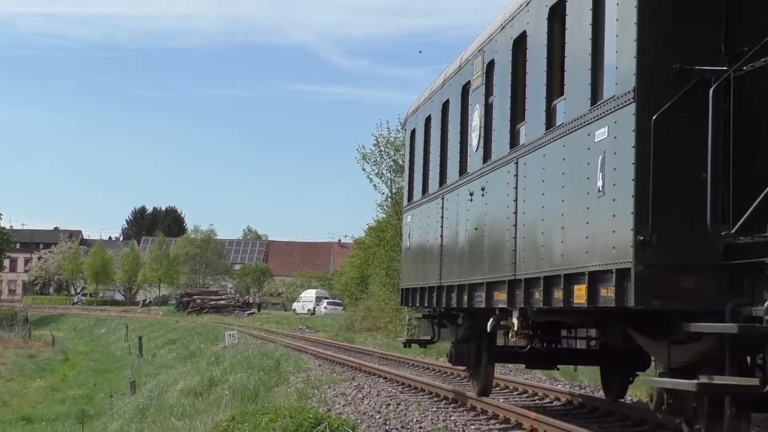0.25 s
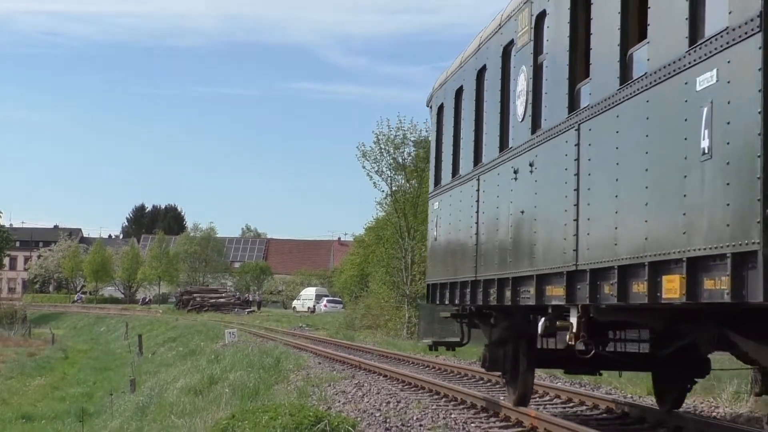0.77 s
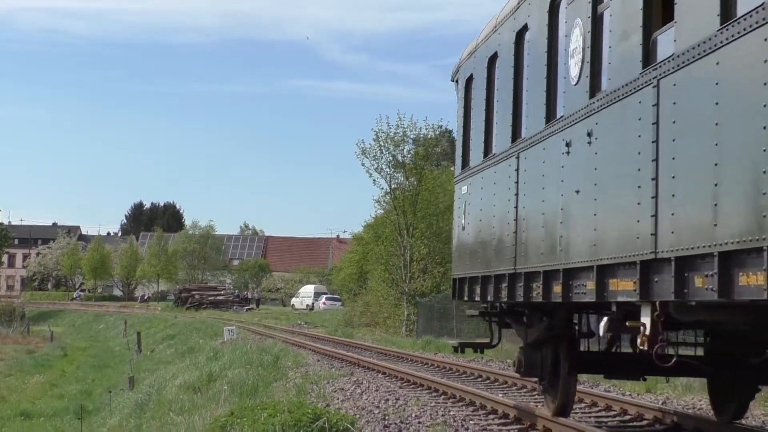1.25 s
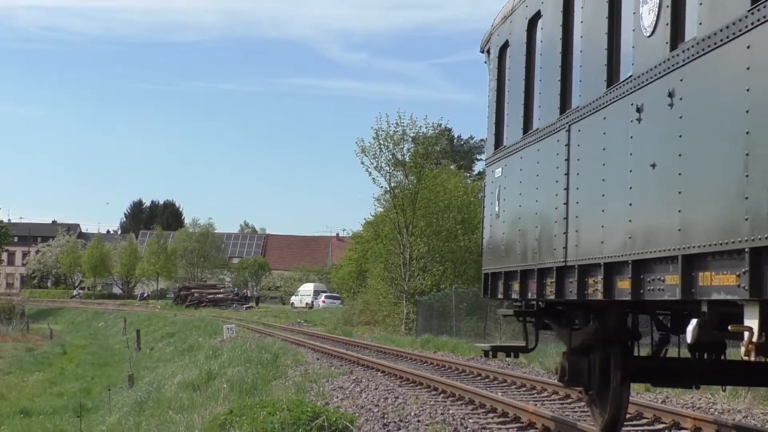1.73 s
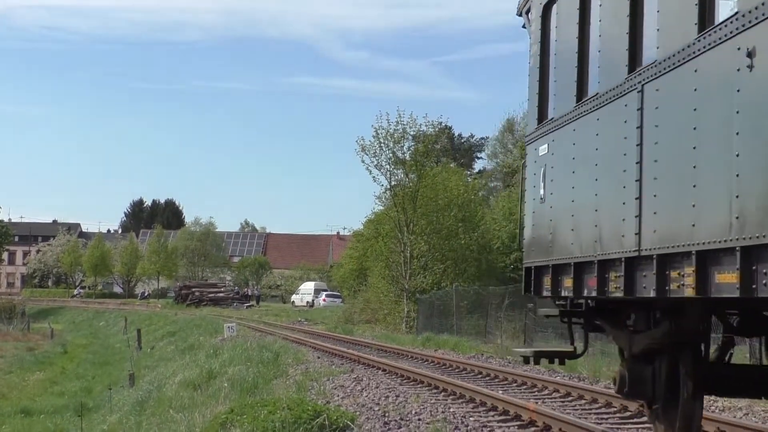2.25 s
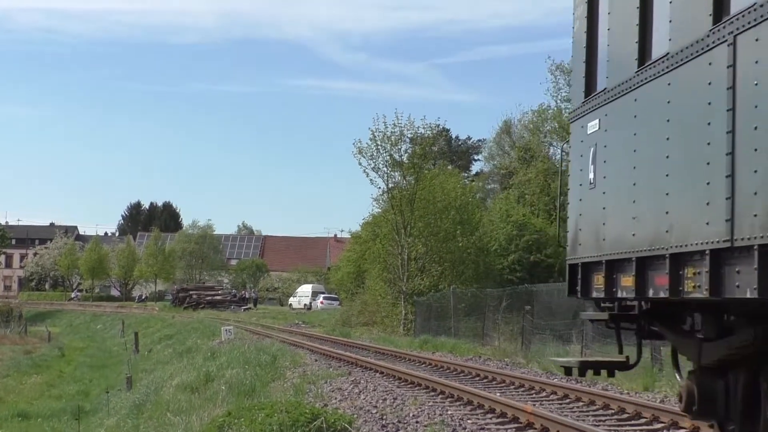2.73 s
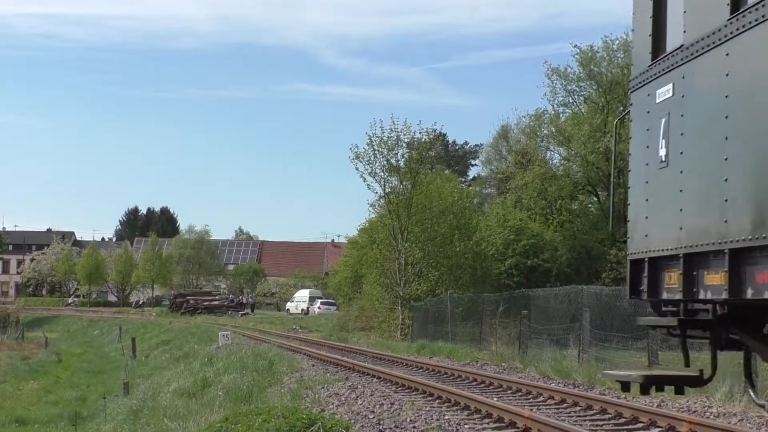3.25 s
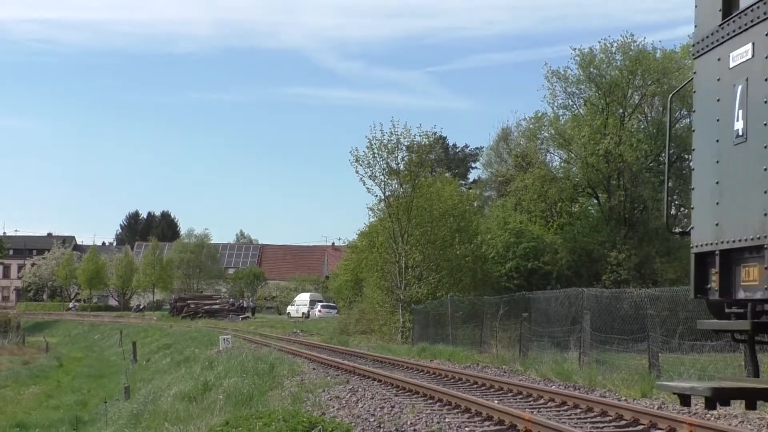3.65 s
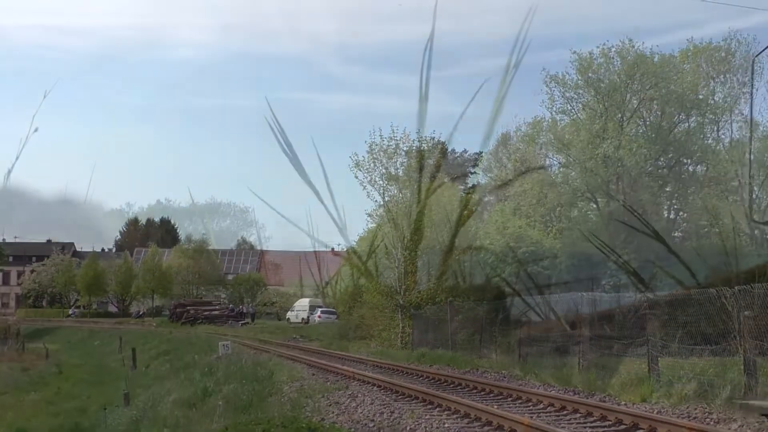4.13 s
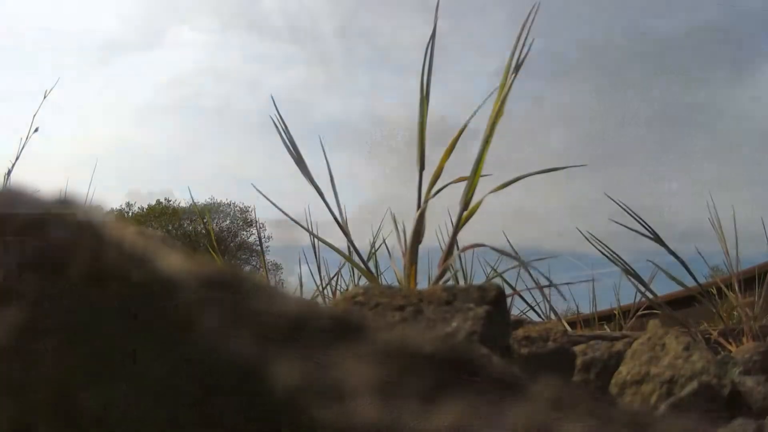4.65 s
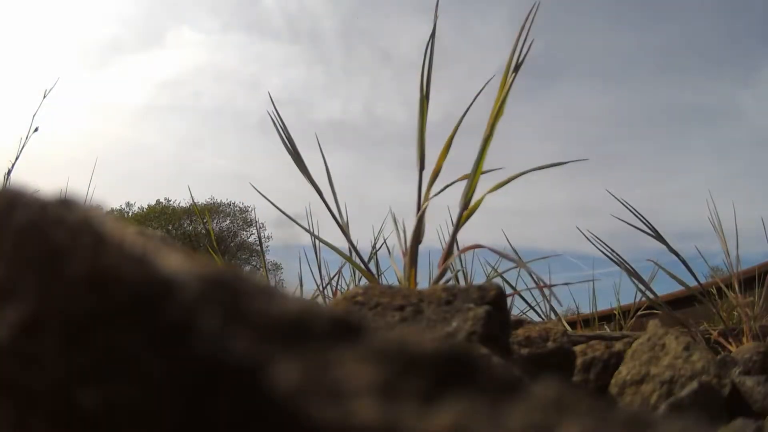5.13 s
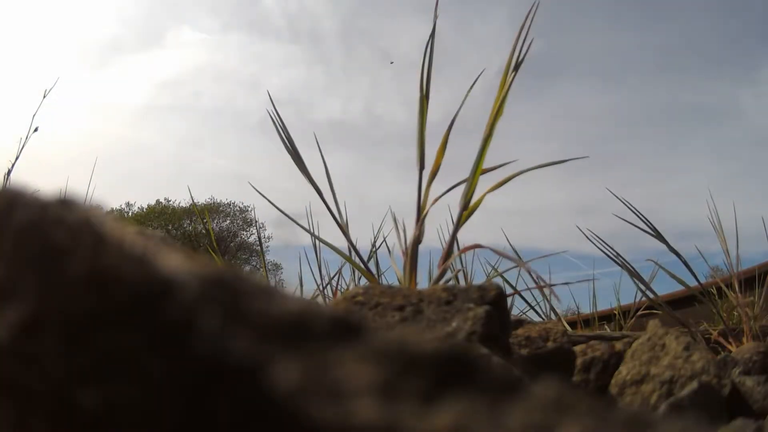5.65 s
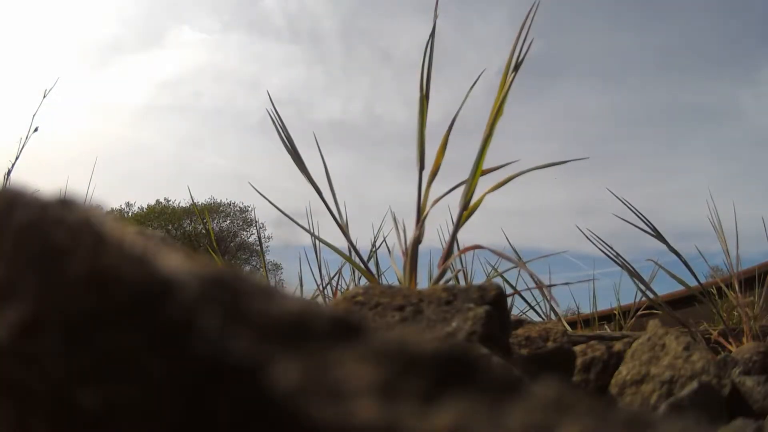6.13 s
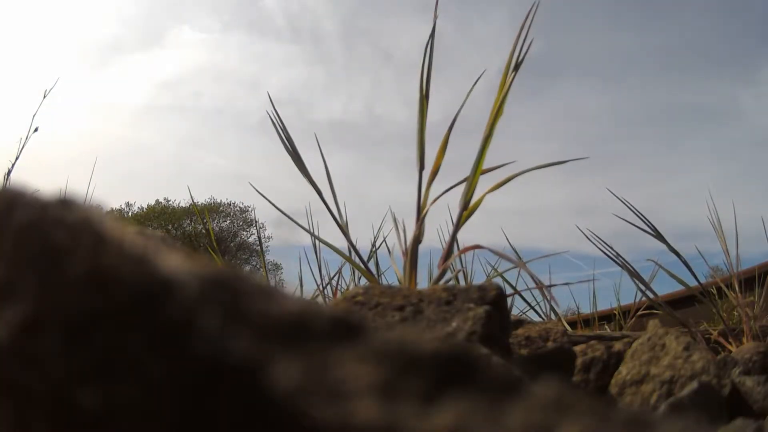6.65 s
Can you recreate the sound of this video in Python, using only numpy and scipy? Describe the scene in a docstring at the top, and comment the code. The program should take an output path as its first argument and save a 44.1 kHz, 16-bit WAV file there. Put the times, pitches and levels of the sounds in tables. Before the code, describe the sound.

Old passenger coaches roll past close on the right, heard from beside the track in open country. For the first 1.5 seconds the wheels grind and squeal on the curve, high and fluttering, over a growing roar of wheels on rough rail. From about 1.5 to 4 seconds the roar and low rumble are fullest, with uneven thuds in the coach floors, a thin hiss and brief metallic rings. The train fades between 4 and 5 seconds, leaving quiet wind rumble on the microphone and a faint distant hum. At about 5.6 seconds a steam whistle in the centre gives one loud blast, sliding quickly up to a steady, medium-pitched note with a little hiss. Around 6.3 seconds it jumps higher and turns rougher, then sags and shuts off near 6.5 seconds, leaving an echo from banks and trees.

```python
"""Beside a railway curve in open country, stereo microphone close to the track. Old passenger coaches
roll by on the right: rough rails set the wheels roaring and the coach bodies rumbling, bumps thud in
the floors, and at first the flanges grind and squeal. The train fades, leaving a far-off hum and wind
on the microphone. In the centre a steam jet sounds a whistle pipe: one blast, which jumps up in pitch
as the valve opens fully and echoes from banks and trees."""
import sys
import numpy as np
from scipy import signal
from scipy.fft import rfft, irfft, next_fast_len
from scipy.io import wavfile
from scipy.ndimage import uniform_filter1d

SR = 44100
rng = np.random.default_rng(int(sys.argv[2]) if len(sys.argv) > 2 else 0)


def generate_wav(sig):
    """Save sig (samples, or channels by samples) to the path in sys.argv[1] as 16-bit PCM at SR."""
    pcm = np.round(np.clip(np.atleast_2d(sig).T, -1, 1) * 32767).astype(np.int16)
    wavfile.write(sys.argv[1], SR, pcm)


N = 303408
TIME = np.arange(N) / SR
FREQS = np.maximum(np.fft.rfftfreq(N, 1 / SR), 1)

# how near the wheels are to the microphone, as the level of their roar: (time [s], level [dB])
NEARNESS = [(0, -27.5), (0.35, -26), (0.8, -24), (1.2, -21), (1.6, -20.5), (1.85, -18.5), (2.3, -18),
            (3.3, -20), (3.7, -19.5), (4.3, -20.5)]
# broad roar of wheels on rough rail: (frequency [Hz], relative level [dB])
ROAR_SPECTRUM = [(150, -25), (250, -2), (324, -9.5), (359, -2), (465, -1.5), (947, -4.5), (1040, -6),
                 (1120, -4.5), (1330, -6.5), (1720, -6.5), (2010, -10), (2500, -8), (2800, -9),
                 (3900, -15.5), (4650, -20.5), (5500, -23.5), (7150, -37), (12100, -120)]
# wheel and rail resonances: (frequency [Hz], width [Hz], relative level [dB])
WHEEL_RAIL_MODES = [(630, 70, -4), (935, 90, -0.5), (1120, 60, -8), (1700, 40, -7), (2430, 200, -7),
                    (2580, 35, -12), (2970, 150, -5.5), (3215, 80, -11), (3640, 200, -4.5), (4012, 65, -8),
                    (4285, 60, -10), (4480, 100, -15), (4655, 150, -10.5), (5010, 50, -17), (5240, 60, -22),
                    (5890, 110, -17), (6100, 130, -15.5), (6330, 120, -18), (6770, 110, -20),
                    (7510, 200, -10.5), (8550, 400, -17), (9550, 450, -17)]
# hiss where wheel meets rail: (frequency [Hz], relative level [dB])
CONTACT_SPECTRUM = [(2820, -29), (4800, -5), (5600, -10.5), (6070, -6.5), (7000, -10), (7800, -9.5),
                    (8500, -6.5), (9000, -9), (9730, -6.5), (11200, -9.5), (11700, -13), (12800, -10),
                    (13450, -18), (14100, -10.5), (14750, -17), (15200, -25.5), (15500, -34)]
# rumble of the coach body: (frequency [Hz], relative level [dB])
RUMBLE_SPECTRUM = [(22, -18.5), (35, -20), (50, -18), (70, -2.5), (95, -4), (120, 3.5), (150, -4.5),
                   (200, -3), (245, -3), (300, -7), (340, -4.5)]
# drumming resonances of the coach floor: (frequency [Hz], width [Hz], relative level [dB])
FLOOR_MODES = [(136, 21.9, -11), (167.3, 42, 1.5)]
# brief wheel rings and rasps: (middle [s], length [s], frequency [Hz], width [Hz], level [dB])
WHEEL_RINGS = [(0.09, 0.15, 2280, 86, -30.5), (0.08, 0.22, 3630, 100, -36), (0.09, 0.2, 8400, 1400, -27.5),
               (0.204, 0.04, 1060, 60, -27.5), (0.3, 0.25, 1786, 20, -33.5), (0.23, 0.04, 4440, 40, -28),
               (0.34, 0.07, 6860, 14, -26), (0.356, 0.06, 4450, 44, -29.5), (0.501, 0.08, 2460, 90, -27),
               (0.625, 0.055, 2400, 98, -27), (0.677, 0.05, 4500, 30, -34), (0.75, 0.04, 6860, 13, -23),
               (0.745, 0.052, 4470, 26, -31.5), (0.77, 0.06, 2420, 80, -31.5),
               (0.802, 0.9, 2180, 180, -33.5), (0.83, 0.07, 13730, 20, -25.5),
               (0.997, 0.041, 4350, 35, -31.5), (1.04, 0.08, 13730, 20, -25), (1.11, 0.084, 6830, 23, -24),
               (1.2, 0.12, 2420, 46, -30), (1.22, 0.066, 8650, 1700, -29), (1.247, 0.068, 4425, 40, -32.5),
               (1.33, 0.11, 1820, 75, -28.5), (1.382, 0.13, 5040, 50, -33.5), (1.39, 0.2, 3655, 45, -29),
               (1.685, 0.25, 3700, 110, -34), (2.047, 0.87, 6140, 450, -35),
               (2.032, 0.25, 2470, 300, -30.5), (2.099, 0.7, 910, 280, -28), (2.33, 0.22, 2440, 230, -30.5),
               (2.5, 0.25, 4000, 37, -33.5), (2.93, 0.14, 2510, 46, -26.5), (3.1, 0.19, 2540, 60, -29),
               (3.098, 0.5, 3930, 50, -39), (3.153, 0.3, 3530, 350, -31), (3.271, 0.34, 8740, 200, -37.5),
               (3.68, 0.19, 5880, 80, -36), (3.704, 0.2, 2850, 180, -29.5), (3.882, 0.16, 2640, 44, -29.5),
               (3.751, .8, 4700, 90, -37), (3.878, 0.36, 7470, 150, -38.5)]
# flange grinding on the rail: (frequency [Hz], relative level [dB])
GRIND_SPECTRUM = [(2000, -7.5), (3300, -5), (4000, -10), (4800, -9.5), (6000, -5), (6550, -5.5),
                  (7300, -2.5), (8000, 0), (8600, -0.5), (9500, -3.5), (10200, -6), (12000, -4),
                  (13300, -7), (13850, -1), (14300, -10.5), (15000, -13), (16000, -20)]
# resonances of a squealing wheel: (frequency [Hz], width [Hz], relative level [dB])
SQUEAL_MODES = [(1480, 70, -14), (1780, 60, -14), (2435, 70, -7.5), (3600, 130, -9), (4430, 50, -3),
                (5070, 90, -16), (6797, 12, -3.3), (6860, 9, -2), (6890, 130, -6.5), (7811, 12, -7.5),
                (7900, 40, -13), (8852, 14, -14), (9305, 40, -11), (9500, 50, -13), (9652, 14, -15),
                (10515, 14, -14), (11290, 22, -7), (11900, 120, -11), (12850, 100, -14), (13730, 24, -4.7),
                (14700, 200, -16)]
# stutter of another wheel's squeak: (time [s], level [dB])
SQUEAK_LEVEL = [(0, -18.5), (0.04, -29), (0.065, -22.5), (0.095, -18.5), (0.122, -19), (0.138, -35),
                (0.15, -19), (0.175, -40), (0.24, -100)]
# bumps in the track thudding in the floor: (time [s], level [dB], pitch [Hz])
BUMPS = [(1.555, -20.5, 196), (1.70, -17.5, 178), (1.81, -17, 151), (1.915, -19, 112), (2.09, -18, 170),
         (2.25, -18, 170), (2.385, -15, 180), (2.53, -18, 135), (2.761, -12.5, 171), (2.89, -18.5, 121),
         (3.14, -16.5, 157), (3.305, -21.5, 178), (3.435, -16.5, 163), (3.535, -22.5, 156),
         (3.6, -18.5, 160), (3.73, -18.5, 161), (3.935, -17.5, 151), (4.09, -18.5, 153)]
# how alike the two microphone ports hear the train: (frequency [Hz], likeness [0-1])
PORT_LIKENESS = [(30, .6), (70, .93), (150, 1), (500, 0.75), (800, 1), (1200, 0.72), (2000, 0.34),
                 (3000, 0.55), (5200, 0.93), (5800, .99)]
# the train's balance between the ports: (frequency [Hz], left minus right [dB])
PORT_BALANCE = [(60, -3.5), (92, 1.5), (140, 1), (210, 0.5), (330, -0.5), (500, -4.5), (770, -6.5),
                (1170, -11), (1790, -10.5), (2740, -9), (4190, -5.5), (6410, 1.5), (9810, -6),
                (15000, -2.5)]
# the train's phase between the ports: (frequency [Hz], left lead [rad])
PORT_PHASE = [(80, -.2), (250, -0.46), (450, -0.64), (900, -1.3), (1200, -0.48), (1600, -0.052),
              (2200, 0.44), (3500, 0.14), (5200, 1), (5800, 0)]
# wash of distant countryside: (frequency [Hz], relative level [dB])
AIR_SPECTRUM = [(130, -4.5), (230, -5), (460, -6), (530, -6), (610, -7.5), (720, -8), (1100, -14.5),
                (1270, -9), (1550, -22.5), (1900, -23), (2400, -30.5), (6500, -35), (7400, -42),
                (8000, -64)]
# tones of a faint far-off hum: (frequency [Hz], width [Hz], relative level [dB])
HUM_MODES = [(216, 8, -7.5), (372, 6, -5), (467, 6, -7), (524, 4, 2), (540, 6, -9.5), (572, 4, -1),
             (580, 8, -6.5), (626, 6, -1)]
# low rumble of wind on the microphone: (frequency [Hz], relative level [dB])
WIND_SPECTRUM = [(12, -6), (22, -0.5), (32, 7), (58, 5.5), (75, -3.5), (112, -5.5), (150, -18)]
# the whistle's pitch, following the steam pressure: (time [s], pitch [Hz])
WHISTLE_PITCH = [(5.59, 287.5), (5.635, 368.5), (5.67, 389.3), (5.8, 374.2), (6.0, 375.5), (6.09, 383),
                 (6.22, 379.2), (6.275, 411.5), (6.305, 411.5), (6.335, 418.5), (6.415, 414.8),
                 (6.447, 385), (6.48, 322)]
# two abrupt drops in the blast: (time [s], level change [dB])
WHISTLE_DROPS = [(6.081, -3), (6.111, -2)]
# the pipe's overtones: (harmonic [number], level at soft pressure [dB], level at full pressure [dB])
WHISTLE_OVERTONES = [(2, -37.5, -27.5), (3, -35.5, -25), (4, -47.5, -35.5), (5, -70, -60), (6, -61, -59),
                     (7, -66, -54.5)]
# hiss of the steam jet: (frequency [Hz], relative level [dB])
STEAM_SPECTRUM = [(300, 7), (900, 5), (1800, 0.5), (3000, 0), (5500, 0), (7000, -2), (7500, -9.5),
                  (8000, -38.5), (9000, -68.5)]
# upper resonances of the pipe: (frequency [Hz], width [Hz], relative level [dB])
PIPE_MODES = [(800, 70, -9.5), (1215, 70, -4), (1600, 70, -10.5), (1830, 35, -19.5), (2110, 50, -18.5),
              (2480, 150, -23), (2800, 700, -24)]
# echoes from banks and trees: (delay [s], level [dB], tilt from 400 to 1600 Hz [dB/octave])
ECHOES = [(.032, -18.5, 4), (.068, -27.5, 10), (.115, -31.5, 14.5), (.2, -31.5, 7.5), (.27, -33.5, 4),
          (.33, -31, 2), (.385, -30, -2), (.435, -33, 6.5), (.52, -31, 1)]


def from_db(db):
    """Decibels to gain."""
    return 10 ** (np.asarray(db) / 20)


def rms_one(x):
    """Scale to unit power."""
    return x / np.sqrt(np.mean(x ** 2) + 1e-20)


def in_time(points):
    """A table of (time, value) at every sample."""
    return np.interp(TIME, *np.transpose(points))


def across_hz(points):
    """A table of (frequency, value) at every frequency."""
    hz, value = np.transpose(points)
    return np.interp(np.log(FREQS), np.log(hz), value)


def ramp(start_s, length_s):
    """A smooth rise from 0 to 1."""
    return (1 - np.cos(np.pi * np.clip((TIME - start_s) / length_s, 0, 1))) / 2


def held(start_s, attack_s, end_s, fall_db_per_s):
    """Gain that rises to 1, holds and dies away."""
    return ramp(start_s, attack_s) * from_db(-fall_db_per_s * np.maximum(TIME - end_s, 0))


def drift(rate_hz):
    """Random wander with spread 1, mostly slower than rate_hz."""
    coarse = rfft(rng.standard_normal(N // 32))
    slow = irfft(coarse / (1 + (FREQS[:len(coarse)] / rate_hz) ** 2))
    return rms_one(np.interp(TIME, np.linspace(0, TIME[-1], len(slow)), slow))


def noise(gain):
    """Two unrelated noises shaped by a gain per frequency, at unit power."""
    return rms_one(irfft(rfft(rng.standard_normal((2, N))) * gain, N))


def coloured(spectrum):
    """A noise pair with this spectrum, falling off steeply past its ends."""
    skirts = (1 + (spectrum[0][0] / FREQS) ** 12) * (1 + (FREQS / spectrum[-1][0]) ** 24)
    return noise(from_db(across_hz(spectrum)) / np.sqrt(skirts))


def resonating(modes, skirt):
    """A noise pair of randomly driven resonances; a lower skirt widens their flanks."""
    peaks = (from_db(db) / np.sqrt(width) / (1 + ((FREQS - hz) / width * 2) ** 2) ** skirt
             for hz, width, db in modes)
    return noise(sum(peaks))


def limit_cycle(x, window=700):
    """Friction limits the swing, so a ringing part holds a fairly even level."""
    return rms_one(x / np.sqrt(uniform_filter1d(x ** 2, window) + .2))


def wheel_roar(near_db, away_db, track_db=0.45, ring_db=-7.5, sleepers_hz=550):
    """Rough rail shakes wheel and track; the low roar of the sleepers is heard mainly close by."""
    track = coloured(ROAR_SPECTRUM)
    sleepers = signal.sosfiltfilt(signal.butter(2, sleepers_hz, fs=SR, output="sos"), track)
    track += (from_db(0.5 * (away_db + 3)) - 1) * sleepers
    ringing = resonating(WHEEL_RAIL_MODES, skirt=0.97)
    return from_db(near_db) * (from_db(track_db) * track + from_db(ring_db) * ringing)


def contact_hiss(away_db, level_db=-34):
    """Wheel hisses on rail, more strongly as the last axle draws near the microphone."""
    last_axle_db = 5 * ramp(2.14, 0.67)
    return from_db(level_db + 0.42 * away_db + last_axle_db) * coloured(CONTACT_SPECTRUM)


def coach_body(away_db, rumble_db=-22, drum_db=-25.5, far_db=-14.5):
    """Rough rail and bumps shake the body; its floor drums louder once the coach is alongside."""
    jolts = sum(jolt(s) for s, _, _ in BUMPS)
    shaking = from_db(0.76 * drift(30) + 0.5 * jolts)
    rumble = from_db(rumble_db + 0.94 * away_db) * coloured(RUMBLE_SPECTRUM)
    alongside = ramp(0.61, 1.2)
    floor = limit_cycle(resonating(FLOOR_MODES, skirt=0.86), window=3000)
    return shaking * (rumble + from_db(drum_db + far_db * (1 - alongside)) * floor)


def wheel_rings(chatter_db=2.5):
    """Single wheel modes swell, chatter and fade as a tread slips sideways."""
    rings = np.zeros((2, N))
    settle = SR // 10   # samples for a mode to ring up
    for middle_s, length_s, hz, width, db in WHEEL_RINGS:
        active = np.abs(TIME - middle_s) < 2 * length_s
        radius = np.exp(-np.pi * width / SR)
        poles = [1, -2 * radius * np.cos(2 * np.pi * hz / SR), radius ** 2]
        friction = rng.standard_normal((2, settle + active.sum()))
        mode = signal.lfilter([1, 0, -1], poles, friction)[:, settle:]
        swell = np.exp(-((TIME[active] - middle_s) / length_s * 2) ** 2)
        rings[:, active] += from_db(db) * swell * limit_cycle(mode)
    return rings * from_db(chatter_db * drift(70))


def flange_grind(level_db=-21.5, slip_db=1.06):
    """Flanges slide on the rail in the curve with a broad, uneven grinding."""
    envelope = held(start_s=-0.1, attack_s=0.11, end_s=1.39, fall_db_per_s=250)
    return envelope * from_db(level_db + slip_db * drift(32)) * coloured(GRIND_SPECTRUM)


def wheel_squeak(start_hz=1768, rise_hz_per_s=130, jitter=0.0015):
    """One wheel mode locks on and sings a clean, stuttering note, rising slightly."""
    hz = (start_hz + rise_hz_per_s * TIME) * (1 + jitter * drift(60))
    phase = 2 * np.pi * np.cumsum(hz) / SR
    return np.sqrt(2) * from_db(in_time(SQUEAK_LEVEL)) * np.array([np.sin(phase), np.cos(phase)])


def flange_squeal(level_db=-23.5, waver_db=2.0, press_db=1.1):
    """A flange pressed against the rail makes the wheel's modes sing and flutter."""
    envelope = held(start_s=0.13, attack_s=0.21, end_s=1.3, fall_db_per_s=75)
    gain = from_db(level_db + waver_db * drift(75) + press_db * drift(7.3))
    return envelope * gain * limit_cycle(resonating(SQUEAL_MODES, skirt=0.85))


def jolt(start_s, rise_s=0.018):
    """The swing of the coach floor after a bump: a quick rise to 1, a slower decay."""
    age = np.clip((TIME - start_s) / rise_s, 0, 20)
    return (age * np.exp(1 - age)) ** 2


def floor_thuds():
    """Each bump sets the coach floor thudding at a low pitch of its own."""
    thuds = np.zeros(N)
    for s, db, hz in BUMPS:
        phase = 2 * np.pi * hz * TIME + rng.uniform(0, 2 * np.pi)
        thuds += from_db(db) * jolt(s) * np.sin(phase)
    return np.array([np.sqrt(2) * thuds, np.zeros(N)])   # all in the part common to both ports


def microphone_ports(pair):
    """A (common, apart) pair reaches the left and right ports partly alike, unequal in level and phase."""
    common, apart = rfft(pair)
    alike = np.clip(across_hz(PORT_LIKENESS), 0, 1)
    lean = from_db(across_hz(PORT_BALANCE) / 2)
    lead = across_hz(PORT_PHASE)
    common *= np.sqrt((1 + alike) / 2)
    apart *= np.sqrt((1 - alike) / 2)
    left = (common + apart) * lean * np.exp(1j * lead)
    right = (common - apart) / lean
    mean_gain = np.sqrt(lean ** 2 + lean ** -2 + 2 * alike * np.cos(lead)) / 2
    return irfft(np.array([left, right]) / mean_gain, N)


def coaches():
    """The train rolls round the curve, close on the microphone's right."""
    near_db = in_time(NEARNESS)
    away_db = near_db - near_db.max()   # 0 at the closest moment
    rough_patches = from_db(0.5 * drift(12))
    rolling = rough_patches * (wheel_roar(near_db, away_db) + contact_hiss(away_db))
    body = coach_body(away_db) + floor_thuds()
    friction = wheel_rings() + flange_grind() + flange_squeal() + wheel_squeak()
    return microphone_ports(rolling + body + friction)


def open_air(distance_db=-49, wind_db=-41.5, duck_db=-4.5):
    """Distant countryside and wind on the microphone; hum and low rumble duck under the loud blast."""
    duck = ramp(5.6, 0.6)
    wash = coloured(AIR_SPECTRUM)[0]
    hum = from_db(-3) * (1 - duck) * resonating(HUM_MODES, skirt=1.0)[0]
    wind = from_db(wind_db + duck_db * duck) * coloured(WIND_SPECTRUM)[0]
    return from_db(distance_db) * (wash + hum) + wind


def steam_whistle(soft_hz=387, full_hz=412, tone_db=-7.5, steam_db=-45, breath_db=-32, flutter_db=1.17):
    """A steam jet sounds a stopped pipe; at full pressure it is sharper, rougher and carries farther."""
    open_s, shut_s = 5.603, 6.437
    valve = ramp(open_s, 0.11) * (1 - ramp(shut_s, 0.041))
    hz = in_time(WHISTLE_PITCH)
    pressure = np.clip((hz - soft_hz) / (full_hz - soft_hz), 0, 1)   # 0 soft, 1 full
    turbulence = pressure ** 2
    jitter = 0.0011 * drift(40) + 0.009 * turbulence * drift(90)
    phase = 2 * np.pi * np.cumsum(hz * (1 + jitter)) / SR
    resonance_db = 4.5 * np.exp(-((hz - 400.6) / 11) ** 2)   # the pitch passes the pipe's own resonance
    # the fundamental swells slowly, but loses to the overtones at full pressure
    swell_db = 4.5 * (TIME - open_s) - 2.7 * pressure + resonance_db
    tone = from_db(tone_db + swell_db + flutter_db * turbulence * drift(30)) * np.sqrt(2) * np.sin(phase)
    overtones = np.zeros(N)
    for harmonic, soft_db, full_db in WHISTLE_OVERTONES:
        db = soft_db + (full_db - soft_db) * pressure + flutter_db * (1.5 + pressure) * drift(25)
        overtones += from_db(db) * np.sqrt(2) * np.sin(harmonic * phase)
    hiss = from_db(steam_db + swell_db) * coloured(STEAM_SPECTRUM)[0]
    breath = turbulence * from_db(breath_db) * resonating(PIPE_MODES, skirt=0.79)[0]
    upper = valve ** 1.5 * (overtones + breath)   # these come later and go sooner
    drops_db = sum(db * (1 + np.tanh((TIME - s) / 0.00066)) / 2 for s, db in WHISTLE_DROPS)
    blast = from_db(drops_db) * valve * (tone + hiss + upper)
    carry = from_db(-10 * (1 - pressure))
    return blast + countryside_echoes(carry * blast)


def scattered_tail(size, level_db, t60_s):
    """Spectrum of one second of decaying, scattered reflections."""
    tail = from_db(-60 * TIME[:SR] / t60_s) * rng.standard_normal(SR)
    return rfft(from_db(level_db) * rms_one(tail), size) / np.sqrt(SR)


def countryside_echoes(sound, foliage_hz=2600):
    """Far banks and trees return echoes and a long tail, dulled by foliage; near ground a short tail."""
    size = next_fast_len(N + SR)
    hz = np.fft.rfftfreq(size, 1 / SR)
    octaves = np.log2(np.clip(hz, 400, 1600) / 400)
    echoes = sum(from_db(db + tilt * octaves) * np.exp(-2j * np.pi * hz * s) for s, db, tilt in ECHOES)
    far = scattered_tail(size, level_db=-25, t60_s=2.1)
    near = scattered_tail(size, level_db=-16, t60_s=0.61)
    near *= np.clip(hz / 1300, 0, 3)   # ballast and grass scatter mainly short waves
    foliage = 1 / (1 + (hz / foliage_hz) ** 4)
    return irfft(rfft(sound, size) * ((echoes + far) * foliage + near), size)[:N]


def scene():
    """The train fades on the right; the open air and the whistle are in the centre."""
    air = ramp(4, 0.55) * open_air()
    train = (1 - ramp(3.997, 0.87)) * coaches()
    return train + air + steam_whistle()


def record(dry, cutoff_hz=15800):
    """The recorder cuts the top treble steeply."""
    return signal.sosfilt(signal.ellip(12, .1, 90, cutoff_hz, fs=SR, output="sos"), dry)


dry = scene()
out = record(dry)
generate_wav(out)
```